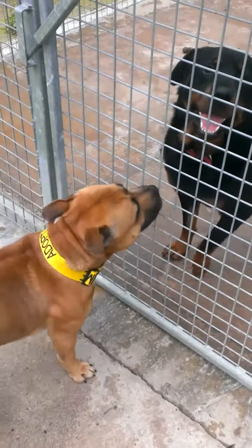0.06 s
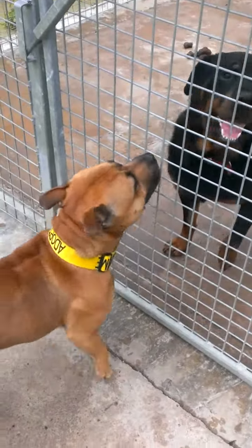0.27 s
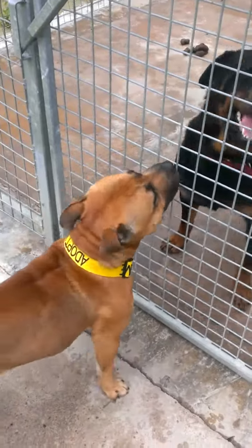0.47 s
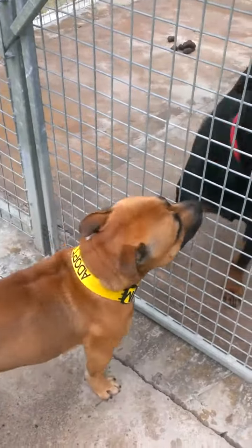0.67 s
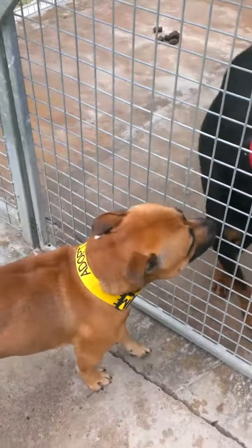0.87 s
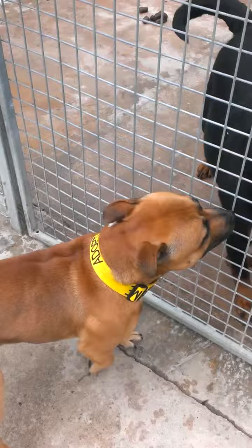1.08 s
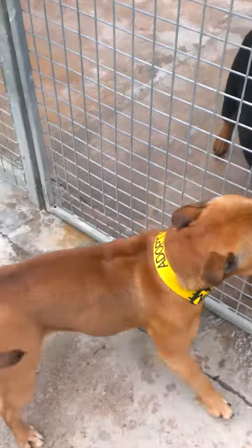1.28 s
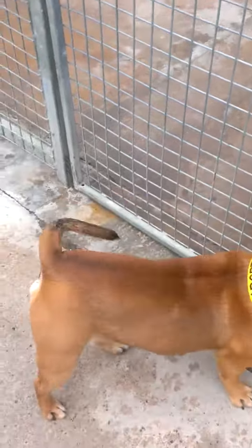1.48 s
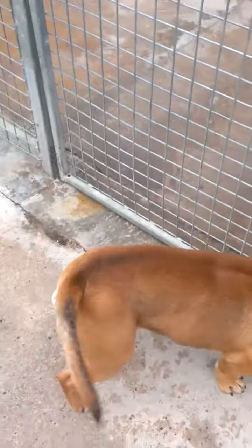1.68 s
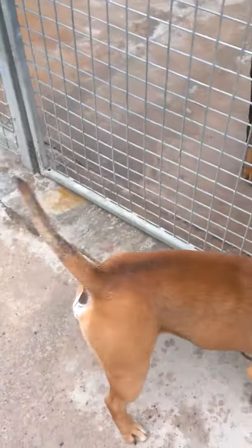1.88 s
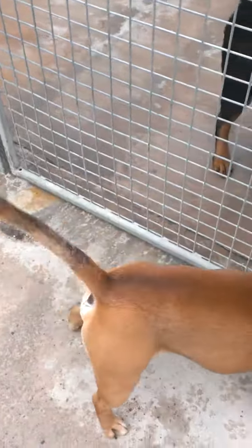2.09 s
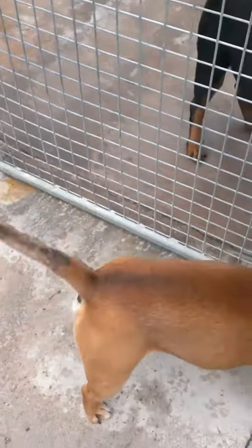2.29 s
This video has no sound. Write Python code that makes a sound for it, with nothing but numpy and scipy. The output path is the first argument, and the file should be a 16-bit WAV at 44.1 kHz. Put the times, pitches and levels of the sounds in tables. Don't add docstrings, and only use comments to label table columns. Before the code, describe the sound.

A small dog barks close by at about 0.2, 0.5, 0.85 and 1.35 seconds, short and sharp, the first and last cracking hoarsely. Soft grunts, a low moan and nasal panting fill the gaps. Distant dogs answer with dull, echoing barks near 1.0, 1.5 and 1.75, then a steady high whine with falling yips and thin nose whistles from 1.9 to 2.3. Concrete yard, faint hiss.

```python
import sys
import numpy as np
from scipy import signal
from scipy.fft import rfft, irfft, next_fast_len
from scipy.io import wavfile
from scipy.ndimage import uniform_filter1d, map_coordinates

SR = 44100
rng = np.random.default_rng(int(sys.argv[2]) if len(sys.argv) > 2 else 0)


def generate_wav(signal):
    frames = np.transpose(np.atleast_2d(signal))
    scaled = np.clip(frames, -1, 1) * 32767
    pcm = np.round(scaled).astype(np.int16)
    wavfile.write(sys.argv[1], SR, pcm)


def rack_gain(trim_db):
    fader = np.asarray(trim_db, float)
    return 10 ** (fader / 20)


N = 101430

# [t/s, pitch f/Hz, level/dB, breath over level/dB]
BARK_ONE_ONSET = [(.213, 655, -44, -60), (.225, 640, -25, -45), (.245, 660, -17, -32),
                  (.256, 675, -18, -28), (.268, 680, -34, -26)]
BARK_ONE_DOUBLED = [(.238, 365, -30, -17), (.252, 376, -16, -21), (.27, 374, -11, -26),
                    (.285, 370, -10, -25), (.297, 360, -17, -17), (.306, 345, -30, -15)]
BARK_ONE_END = [(.294, 700, -26, -18), (.303, 670, -14, -23), (.31, 655, -19, -20), (.318, 650, -11, -26),
                (.33, 580, -24, -20), (.342, 640, -18, -32), (.356, 650, -32, -30)]
BARK_TWO = [(.523, 495.4, -37, -75.5), (0.541, 578.2, -16, -28), (0.563, 648, -13, -27),
            (0.585, 642, -8.5, -38.5), (0.596, 640.8, -15.5, -13), (0.625, 614.5, -19, -18),
            (0.646, 536.3, -16, -36), (0.665, 475, -32, -43)]
BARK_THREE = [(.82, 472.7, -45, -71), (.845, 562.4, -18, -45.5), (.87, 660.5, -10.5, -37),
              (.898, 691.3, -12, -35), (0.916, 691.8, -16, -12.5), (0.953, 542, -26.5, -17.5),
              (0.986, 655, -16.5, -37)]
BARK_FOUR_ONSET = [(1.31, 430, -46, -45), (1.35, 512, -36, -42), (1.36, 535, -28, -36),
                   (1.37, 560, -18, -28), (1.378, 580, -15, -23), (1.386, 650, -11, -22),
                   (1.394, 655, -15, -20), (1.402, 660, -32, -18)]
BARK_FOUR_HOARSE = [(1.384, 325, -28, -18), (1.394, 342, -14, -18), (1.412, 350, -11.5, -21),
                    (1.424, 340, -19, -15), (1.435, 322, -13.5, -18), (1.45, 305, -22, -19),
                    (1.46, 325, -18, -26), (1.472, 335, -32, -28)]
# [t/s, pitch f/Hz, level/dB]
MOAN = [(.695, 250, -42), (.73, 240, -35), (.765, 250, -37), (.82, 260, -46)]
MOAN_RISE = [(.77, 350, -46), (.79, 385, -36), (.815, 460, -34), (.845, 560, -28)]
# [start t/s, length t/s, pitch f/Hz, level/dB]
GRUNTS = [
    (0.42, 0.075, 270, -35),
    (1.0, 0.055, 250, -36),
    (1.46, 0.08, 290, -41),
]
# [t/s, pitch f/Hz, level/dB]
FAR_BARK_ONE = [(1.0, 722, -39), (1.039, 784.7, -25.5), (1.077, 790.4, -24.5), (1.119, 744.4, -29.5),
                (1.208, 700, -33)]
FAR_BARK_TWO = [(1.47, 760, -40), (1.505, 830, -30), (1.53, 680, -28), (1.592, 700, -31), (1.651, 670, -37)]
FAR_BARK_THREE = [(1.68, 800, -40), (1.725, 820, -28), (1.755, 760, -29), (1.79, 790, -29),
                  (1.825, 808, -24), (1.86, 800, -29), (1.89, 795, -37), (1.97, 790, -37)]
FAR_HALF_PITCH_DB = [-32, -38, -32]
# [t/s, pitch f/Hz, level/dB]
WHINE = [(1.94, 940, -37), (2.028, 953, -25), (2.047, 950, -40), (2.07, 935, -25), (2.11, 935, -35),
         (2.154, 935, -40), (2.206, 928, -25.5), (2.26, 926, -31), (2.3, 926, -50)]
YIPS = [
    [(2.06, 1310, -57), (2.085, 1246, -42.5), (2.12, 1160, -49), (2.17, 1018, -33)],
    [(2.19, 1190, -51), (2.24, 1137, -49), (2.27, 1070, -36.5)],
    [(1.6, 1066, -59), (1.64, 1190, -39.5), (1.72, 1206, -42)],
]
# [t/s, pitch f/Hz, level/dB]
WHISTLE_ONE = [(1.645, 4330, -54), (1.68, 4900, -44), (1.71, 5170, -35), (1.75, 5060, -38),
               (1.78, 4700, -44), (1.82, 4350, -54)]
WHISTLE_TWO = [(2.022, 4350, -60), (2.038, 4525, -44), (2.078, 4530, -36), (2.092, 4505, -46),
               (2.105, 4515, -39), (2.125, 4480, -48), (2.16, 4350, -50), (2.2, 4250, -58)]
SQUEAKS = [
    [(0, 7100, -60.5), (.2, 7400, -92)],
    [(.7, 4110, -50.5), (.74, 3940, -48)],
]
SQUEAL = [(1.26, 1330, -62), (1.295, 1285, -48), (1.335, 1235, -50)]
RASPS = [
    [(1.095, 5800, -49), (1.15, 4900, -49)],
    [(.755, 4300, -52), (.79, 3700, -50)],
    [(1.845, 3600, -52), (1.875, 3500, -52)],
    [(2.01, 2870, -48), (2.07, 2820, -51)],
    [(2.15, 4100, -51), (2.18, 3600, -53)],
    [(2.185, 3400, -52), (2.24, 3350, -51)],
    [(2.27, 3000, -56), (2.3, 2850, -56)],
]
# [start t/s, length t/s, level/dB]
PANTS = [
    (0.398, 0.12, -45),
    (.73, .12, -51),
    (1.03, 0.22, -53.5),
    (1.22, .16, -50),
    (1.56, 0.35, -46),
    (1.985, 0.2, -45),
    (2.14, .2, -48),
]

THROAT = [(370, -10.5), (700, 12.5), (1200, -2), (2000, -15.5), (2800, -25), (5000, -45.5), (7100, -13),
          (9500, -36)]
OPEN_THROAT = [(650, -3), (1300, 6), (2000, -5.5), (4000, -29), (7100, -8), (8500, -41.5)]
HOARSE_THROAT = [(350, -34), (690, 0), (1050, -9), (1350, -12), (1700, -23), (2050, -15), (3200, -32),
                 (7100, -19)]
# [f/Hz, level/dB]
DOUBLED_THROAT = [(370, -20), (745, -8), (1125, 0), (1500, -18), (1900, -13), (2300, -26), (4000, -32),
                  (7100, -13)]
DOUBLED_END = [(370, -28), (745, 0), (1125, -12), (1500, -28), (1900, -19), (2300, -32), (4000, -40),
               (7100, -22)]
# [f/Hz, level/dB]
SHUT_THROAT = [(450, 0), (1000, -12), (2200, -32), (2800, -25), (5000, -42), (7100, -26), (9500, -45)]
WIDE_THROAT = [(650, -12), (1250, 0), (2250, -28), (2850, -13), (3300, -34), (5800, -33), (7150, -11),
               (8500, -32)]
# [f/Hz, level/dB]
GRUNT_THROAT = [(250, -9.5), (500, -6.5), (1000, -46), (3000, -58.5)]
FAR_THROAT = [(400, 21.5), (800, 17), (1600, -0.5), (2400, -37), (3500, -93)]
# [f/Hz, level/dB]
BREATH = [(250, -29.5), (1100, 19), (2200, -4), (4000, -15), (7000, 4.5), (10500, -23)]
PANT = [(2000, -9.5), (3200, -8.5), (5000, -2), (7500, 5.5), (10500, -14.5)]
AIR = [(30, -37), (90, -15), (220, -7), (700, -12.5), (1400, -27.5), (5000, -25), (7300, -9.5),
       (10500, -26.5)]
# [f/Hz, left over right level/dB, left's phase lead/rad]
PORTS = [(257, -4, 0), (700, 0.5, 0.67), (1240, 3.5, 1.47), (2430, -0.5, 0.5), (6250, -0.5, 0.5)]
# [f/Hz, time to fall 60 dB t/s]
YARD = [(300, 1), (800, 0.35), (2500, 0.61), (9000, 0.22)]

AIR_DB = -55
NEAR_WET_DB, FAR_WET_DB = -10, -0.5
FAR_PAN_DB, WHINE_PAN_DB, NOSE_PAN_DB = 5.5, -8, 2
FAR_BREATH_DB, FAR_ROUGH, FAR_DULL_HZ = -21, .95, 2300
CLEAN_DB, ROUGH_SPAN_DB = -36, 32
BRIGHTENS = .5
BANDS_DB = 5
CAPSULE_HZ, CAPSULE_WIDE_HZ, CAPSULE_DB = 6910, 400, 0.5
CEILING, TOP_HZ = .95, 10700


def unit(x):
    return x / np.sqrt(np.mean(x ** 2) + 1e-20)


def along(points, hz):
    f, v = np.transpose(points)
    return np.interp(np.log(hz + 1), np.log(f + 1), v)


def wobble(rate, count):
    knots = rng.standard_normal(int(N * rate / SR) + 4)
    return map_coordinates(knots, [np.arange(count) * rate / SR])


def filtered(x, response):
    m = next_fast_len(x.shape[-1] + 8192)
    spectrum = rfft(x, m) * response(np.fft.rfftfreq(m, 1 / SR))
    return irfft(spectrum, m)[..., :x.shape[-1]]


def noise(points, count):
    return unit(filtered(rng.standard_normal(count), lambda hz: rack_gain(along(points, hz))))


def breath_puff(turn, count):
    bands = rng.standard_normal(64)
    banded = filtered(noise(BREATH, count=count),
                      lambda f: rack_gain(BANDS_DB * np.interp(f / 200, np.arange(64), bands)))
    puff = 3.5 * unit(banded) * (1 + .6 * np.cos(turn)) * rack_gain(2 * wobble(80, count=count))
    return filtered(puff, lambda f: 1 / (1 + (300 / (f + 1)) ** 4))


def call(rows, throat, breath_db=-80, rough=0.017, sub_db=-80, fade_s=0.0047, ends=None):
    rows = np.array(rows, float)
    t = np.arange(rows[0, 0], rows[-1, 0], 1 / SR)
    count = len(t)
    hz, db, *more = [uniform_filter1d(np.interp(t, rows[:, 0], c), size=300) for c in rows.T[1:]]
    if more:
        breath_db = more[0]
        rough = np.clip((breath_db - CLEAN_DB) / ROUGH_SPAN_DB, .12, 1)

    jitter = 1 + .03 * rough * wobble(200, count=count)
    turn = 2 * np.pi * np.cumsum(hz * jitter) / SR
    k = np.arange(1, 41)[:, None] / 2
    moved = np.linspace(0, 1, count) ** 1.1 if ends else 0
    shape_db = (1 - moved) * along(throat, k * hz) + moved * along(ends or throat, k * hz)
    half_db = sub_db * (k % 1 > 0)
    effort_db = BRIGHTENS * (db - db.max()) * np.log2(np.maximum(k / 2, 1))
    gain = rack_gain(shape_db + half_db + effort_db) * (k * hz < TOP_HZ)

    flutter_phase = turn / 4 + k + 0.77 * wobble(26.8, count=count)
    flutter = 1 + 0.56 * rough * np.clip(k - 1, 0, 1) * np.cos(flutter_phase)
    wander = np.array([wobble(60, count=count) for partial in k])
    broken = rack_gain(np.minimum(k - 1, 3.5) * wander)
    partials = gain * broken * flutter * np.sin(k * turn + k * k)
    tone = partials.sum(0) / np.sqrt((gain ** 2).sum(0) / 2)
    tone = tone * rack_gain(4 * rough * wobble(90, count=count))

    voice = tone + rack_gain(breath_db) * breath_puff(turn, count)
    fade = np.clip(np.minimum(t - t[0], t[-1] - t) / fade_s, 0, 1)
    out, start = np.zeros(N + SR), round(t[0] * SR)
    out[start:start + count] = rack_gain(db) * fade * voice
    return out[:N]


def yard(x, wet_db):
    hz, t, z = signal.stft(rng.standard_normal((2, SR)), SR, nperseg=256)
    decay = rack_gain(-60 * t / along(YARD, hz)[:, None])
    tail = signal.istft(z * decay, SR, nperseg=256)[1]
    tail = tail + 0.76 * tail[0] * [[0], [1]]
    tail = tail / np.linalg.norm(tail, axis=1)[:, None]
    tail = np.pad(tail, ((0, 0), (900, 0)))
    return rack_gain(wet_db) * signal.fftconvolve(x[None], tail, axes=1)[:, :N]


def placed(x, pan_db, wet_db):
    return x * rack_gain([[pan_db / 2], [-pan_db / 2]]) + yard(x, wet_db)


def near_barks():
    return [call(BARK_ONE_ONSET, OPEN_THROAT),
            call(BARK_ONE_DOUBLED, DOUBLED_THROAT, ends=DOUBLED_END),
            call(BARK_FOUR_ONSET, SHUT_THROAT, ends=WIDE_THROAT),
            call(BARK_FOUR_HOARSE, HOARSE_THROAT),
            call(BARK_ONE_END, THROAT), call(BARK_TWO, THROAT), call(BARK_THREE, THROAT)]


def near_grunts():
    out = call(MOAN, GRUNT_THROAT, rough=.7, fade_s=.015)
    out = out + call(MOAN_RISE, GRUNT_THROAT, rough=.4, fade_s=.015)
    for s, length, hz, db in GRUNTS:
        rows = [(s, hz, db - 10), (s + length / 2, hz, db), (s + length, hz, db - 10)]
        out = out + call(rows, GRUNT_THROAT, breath_db=-18, rough=1.4, fade_s=.02)
    return out


def near_dog():
    barks = near_barks()
    side, ports = np.array([[.5], [-.5]]), np.array(PORTS)

    def heard(hz):
        level = rack_gain(side * along(ports[:, :2], hz))
        return level * np.exp(1j * side * along(ports[:, ::2], hz))

    return filtered(sum(barks) + near_grunts(), heard) + sum(yard(x, NEAR_WET_DB) for x in barks)


def far_dogs():
    barks = 0
    for rows, sub_db in zip((FAR_BARK_ONE, FAR_BARK_TWO, FAR_BARK_THREE), FAR_HALF_PITCH_DB):
        bark = call(rows, FAR_THROAT, FAR_BREATH_DB, FAR_ROUGH, sub_db, fade_s=.02)
        barks = barks + placed(bark, FAR_PAN_DB, FAR_WET_DB)
    barks = filtered(barks, lambda hz: 1 / (1 + (hz / FAR_DULL_HZ) ** 6))
    thin = [(1000, 18.5), (1900, -12), (2400, -44), (5000, -90)]  # f/Hz, level/dB
    whines = call(WHINE, thin, rough=.08) + sum(call(y, thin, rough=.1, fade_s=.012) for y in YIPS)
    return barks + placed(whines, WHINE_PAN_DB, wet_db=-16)


def swell(s, length):
    return np.sin(np.pi * np.clip((np.arange(N) / SR - s) / length, 0, 1)) ** 0.8


def nose():
    pipe = [(5000, 5), (9500, -7.5)]  # f/Hz, level/dB
    squeal_pipe = [(1300, -2), (7000, 7.5), (10000, -18.5)]
    thin_calls = [WHISTLE_ONE, WHISTLE_TWO] + SQUEAKS
    whistles = sum(call(rows, pipe, breath_db=-27.5, rough=.45) for rows in thin_calls)
    rasps = sum(call(rows, pipe, rough=1.3, fade_s=.015) for rows in RASPS)
    squeal = call(SQUEAL, squeal_pipe, rough=.5, fade_s=.012)
    pants = noise(PANT, count=N) * sum(rack_gain(db) * swell(s, length) for s, length, db in PANTS)
    pants = pants * rack_gain(3 * wobble(40, count=N))
    return placed(whistles + rasps + squeal + pants, NOSE_PAN_DB, wet_db=-8)


def air():
    both = noise(AIR, count=N)
    drift_db = 2.5 * wobble(6, count=N)
    return rack_gain(AIR_DB + drift_db) * np.array([both + 0.79 * noise(AIR, count=N) for port in "lr"])


def scene():
    return near_dog() + far_dogs() + nose() + air()


def roll_off(x):
    return signal.sosfilt(signal.butter(12, 10700, fs=SR, output="sos"), x)


def record(dry):
    held = dry / (1 + (dry / CEILING) ** 4) ** .25

    def colour(hz):
        resonance_db = CAPSULE_DB / (1 + ((hz - CAPSULE_HZ) / CAPSULE_WIDE_HZ) ** 2)
        bass_cut = 1 / np.sqrt(1 + (60 / (hz + 1)) ** 2)
        return rack_gain(resonance_db) * bass_cut * (hz < TOP_HZ)

    return roll_off(filtered(held, colour))


dry = scene()
out = record(dry)
generate_wav(out)
```